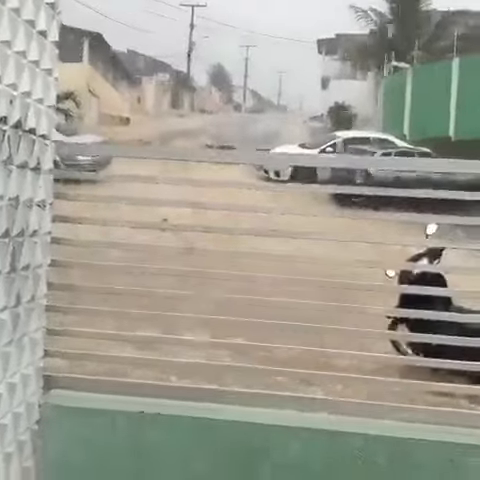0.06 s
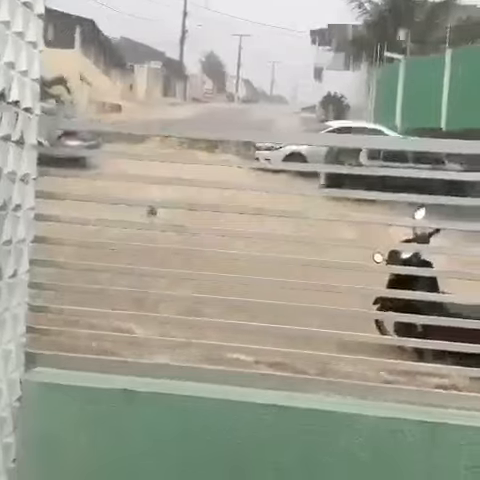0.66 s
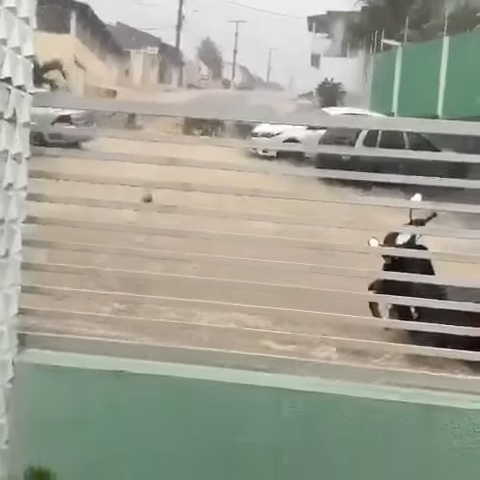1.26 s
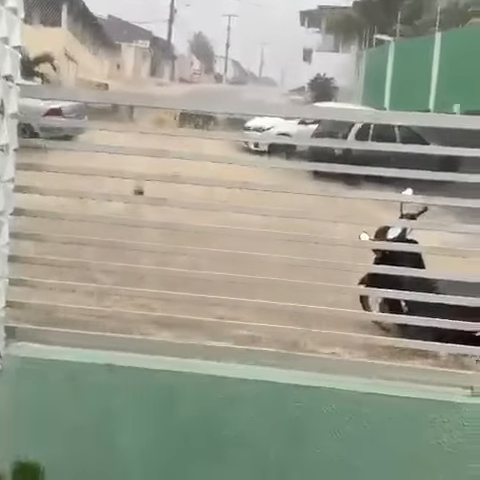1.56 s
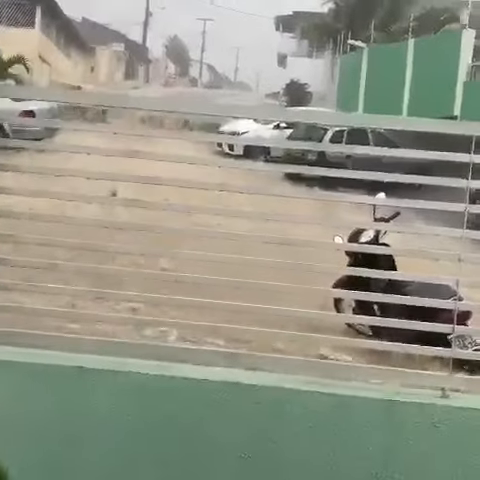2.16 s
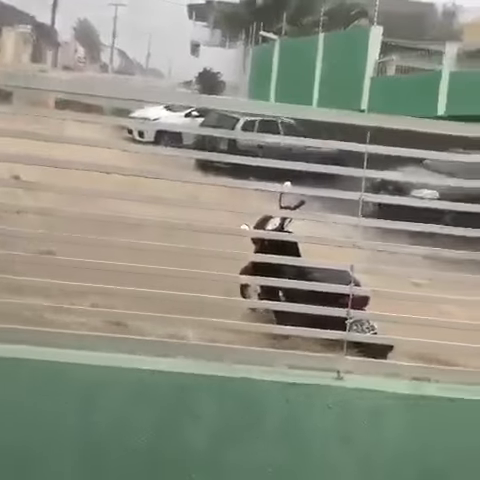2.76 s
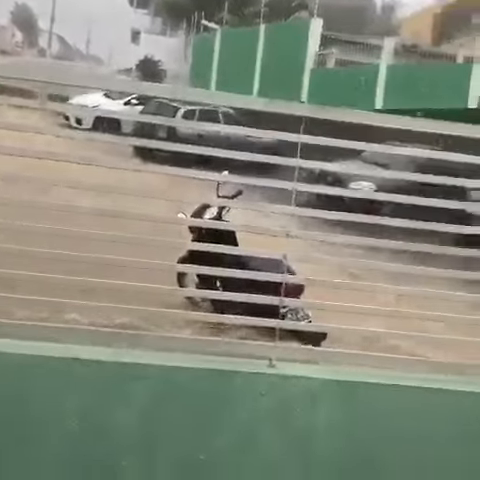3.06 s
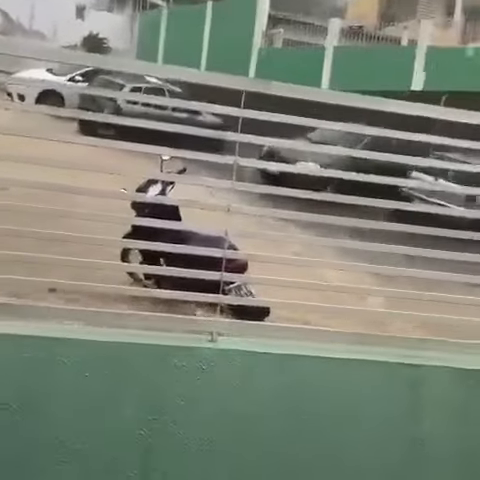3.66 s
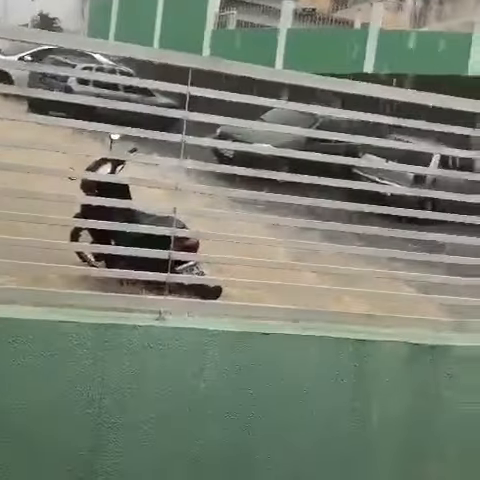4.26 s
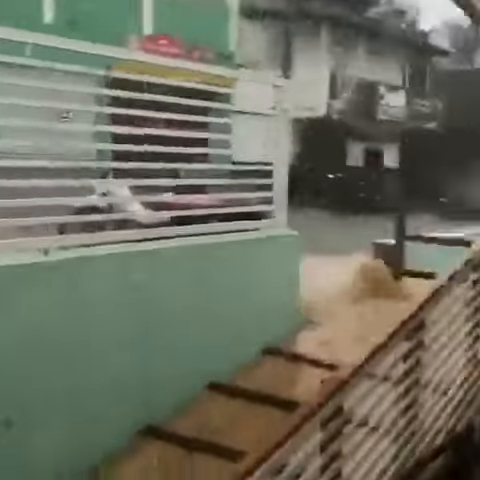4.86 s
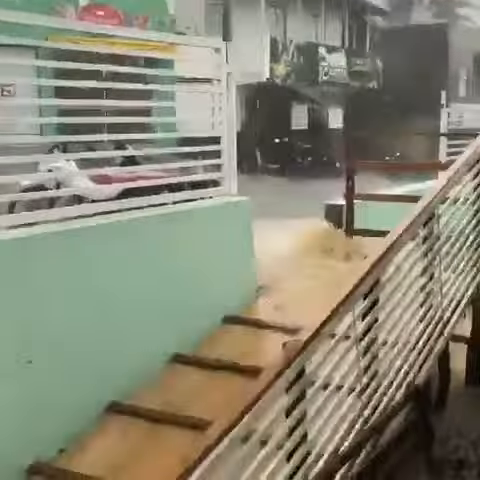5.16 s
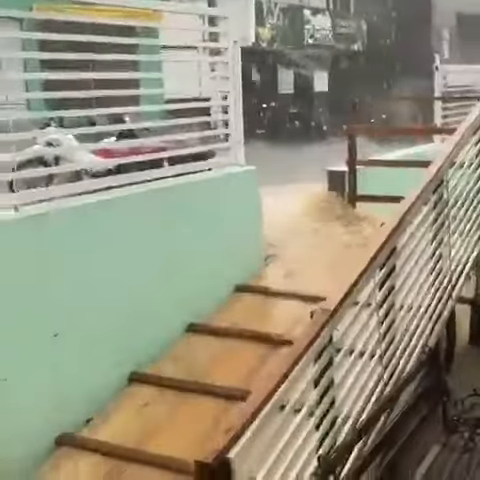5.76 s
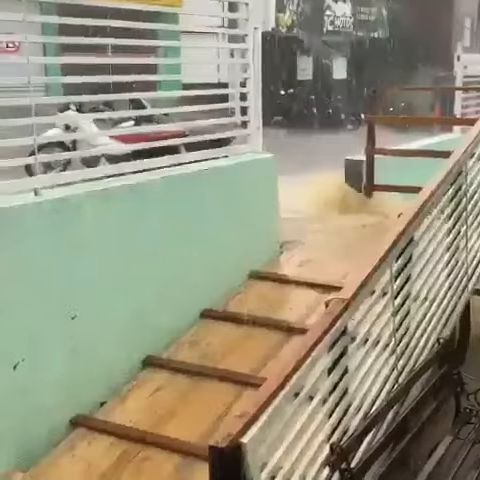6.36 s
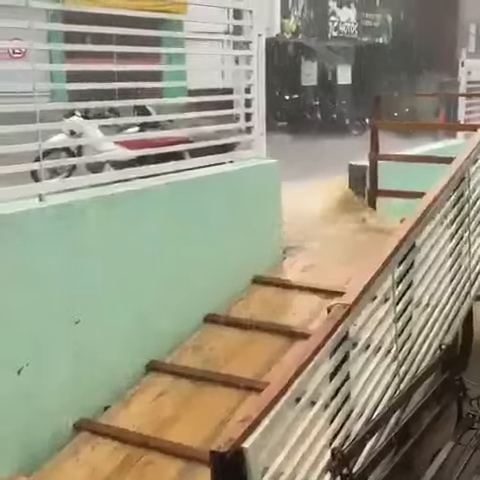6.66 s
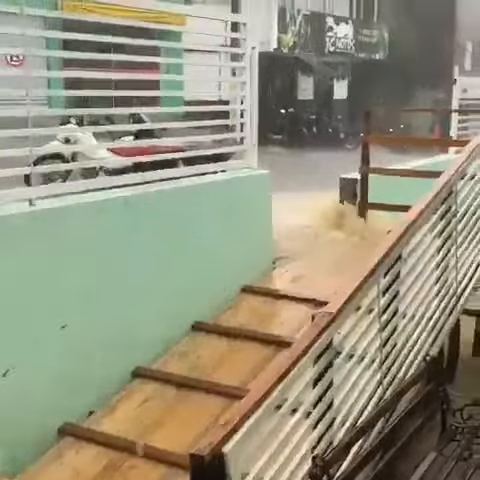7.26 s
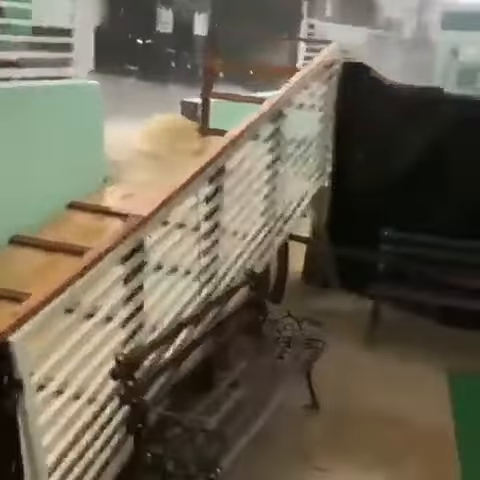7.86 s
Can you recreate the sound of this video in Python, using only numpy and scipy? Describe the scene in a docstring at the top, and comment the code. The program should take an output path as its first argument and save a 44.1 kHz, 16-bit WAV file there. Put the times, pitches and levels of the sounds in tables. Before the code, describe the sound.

Muddy floodwater rushes steadily along a street under hissing heavy rain, with a few close drips.

```python
"""A sheltered yard off a flooded street, in a downpour, heard through one small microphone.
Out in the street muddy water rushes past with a deep rumble, countless ringing bubbles and breaking
waves; heavy drops smack into it, and a faint hollow note swells and sinks. Rain hisses on the water
and the walls, loudest while the microphone faces the open gateway, where water piling up at the
foot of a ramp rumbles. Close to the microphone a few drips land and echo briefly off the walls."""
import sys
import numpy as np
from scipy import signal
from scipy.fft import rfft, irfft
from scipy.io import wavfile
from scipy.ndimage import uniform_filter1d

SR = 44100
rng = np.random.default_rng(int(sys.argv[2]) if len(sys.argv) > 2 else 0)


def log_audio(samples):
    """Write samples as a 16-bit WAV file to the path given in sys.argv[1]."""
    # one column per channel
    frames = np.atleast_2d(samples).T
    # limit to full scale, then quantise
    limited = np.clip(frames, -1, 1)
    pcm = np.round(limited * 32767).astype(np.int16)
    wavfile.write(sys.argv[1], SR, pcm)


N = 358533

# spectrum of the deep churning: f/Hz, relative level/dB
CHURN_SPECTRUM = [(25, -43), (60, -39), (95, -19.5), (130, -10.5), (175, -4), (230, -0.5), (280, 0.3),
                  (400, -3.5), (600, -10), (1500, -50)]
# spectrum of the rushing surface: f/Hz, relative level/dB
RUSH_SPECTRUM = [(80, -46.5), (250, -12.5), (400, -1), (520, 1), (900, -0.5), (1400, -3.5), (2000, -8.5),
                 (2600, -16.5), (3500, -29), (6000, -53)]
# how openly the microphone hears the water in the street: t/s, gain/dB
WATER_EXPOSURE = [(0.0, -1.44), (1.8, -1.5), (2.5, -1.1), (3.8, -0.4), (5.2, -0.36), (6.0, -0.8),
                  (6.4, -1.6), (7.2, -1.56), (8.13, -1.1)]
# spectrum of the rain, with a bright sizzle near the top: f/Hz, relative level/dB
RAIN_SPECTRUM = [(200, -28), (900, -4), (2000, 3), (2800, -2), (3600, -7.5), (4400, -8.5), (5100, -4.5),
                 (5900, 1.6), (6500, 3.5), (7000, 0), (7500, -11.5), (8200, -47.5)]
# how openly the microphone faces the gateway and the rain beyond: t/s, gain/dB (0 = fully open)
MIC_EXPOSURE = [(0.0, -3.5), (1.9, -3.5), (2.7, -2.0), (3.9, -1.8), (4.5, -1), (5.1, -1), (5.95, -1.2),
                (6.55, -2.5), (7.4, -2.7), (8.13, -1.7)]
# waves breaking in the current: crest t/s, length/s, level/dB, f/Hz, width/Hz
BREAKING_WAVES = [(0.55, 0.56, -21, 725, 420), (0.67, 0.2, -23, 340, 160), (1.2, 0.74, -25.5, 272, 150),
                  (2.163, 0.62, -24.5, 680, 420), (2.62, 0.4, -28, 1340, 450), (2.837, 0.25, -20, 725, 240),
                  (4.02, 0.48, -25, 680, 420), (4.837, 0.22, -27, 1110, 400),
                  (5.158, 0.39, -24.5, 430, 350), (5.23, 0.2, -22, 1150, 260), (5.795, 0.32, -23, 585, 360),
                  (7.754, 0.43, -26.5, 304, 200)]
# drips near the microphone: t/s, slap peak level/dB, f/Hz, width/Hz, spray below peak/dB, spray decay/s
CLOSE_DRIPS = [(1.118, -14, 5600, 1300, 15, 0.023), (3.677, -15, 6900, 890, 19, .013),
               (4.273, -20, 5300, 2000, 12, .03), (4.419, -19, 3900, 3000, 12, .015),
               (4.652, -19, 6400, 1200, 12, 0.017), (4.888, -16, 5800, 2500, 21, .008),
               (4.943, -18, 4000, 2500, 17, .01), (5.741, -17, 6170, 1500, 23, .008),
               (5.893, -15, 3000, 4000, 18, .012), (5.954, -17.5, 6300, 1100, 10, .04),
               (5.974, -20, 3460, 900, 14, .013), (6.345, -16, 6450, 700, 21, .01),
               (6.458, -16, 7140, 1200, 19, .01), (6.985, -13, 3400, 1900, 16, .013)]


def gain_of(db):
    """Decibels to amplitude."""
    return 10 ** (np.asarray(db) / 20)


def unit_rms(x):
    """Scales to rms 1."""
    return x / np.sqrt(np.mean(x ** 2) + 1e-20)


def fader(curve):
    """The gain at every sample of a curve of t/s, gain/dB."""
    s, db = np.transpose(curve)
    return gain_of(np.interp(np.arange(N) / SR, s, db))


def swell(crest_s, length_s):
    """A smooth rise from 0 to 1 and back."""
    return np.cos(np.pi * np.clip((np.arange(N) / SR - crest_s) / length_s, -.5, .5)) ** 2


def coloured(x, spectrum):
    """Filters x by a spectrum, interpolated on a log-frequency axis; rms 1."""
    hz, db = np.transpose(spectrum)
    bin_db = np.interp(np.log(np.fft.rfftfreq(N, 1 / SR) + 1), np.log(hz + 1), db)
    return unit_rms(irfft(rfft(x) * gain_of(bin_db), N))


def patchy_noise(spectrum, patch_s, patch_hz, patchy_db, size=1024):
    """Noise whose level wanders in patches of time and frequency; rms 1."""
    hop = size // 4
    frames = signal.stft(rng.standard_normal(N), nperseg=size, noverlap=size - hop)[2]
    patches = uniform_filter1d(rng.standard_normal(frames.shape), max(1, round(patch_s * SR / hop)))
    patches = unit_rms(uniform_filter1d(patches, max(1, round(patch_hz * size / SR)), axis=0))
    noise = signal.istft(frames * gain_of(patchy_db * patches), nperseg=size, noverlap=size - hop)[1]
    return coloured(noise[:N], spectrum)


def noise_band(hz, width_hz):
    """Noise gathered round one resonance; rms 1."""
    b, a = signal.iirpeak(hz, hz / width_hz, fs=SR)
    return unit_rms(signal.filtfilt(b, a, rng.standard_normal(N)))


def impacts(per_s, spread_db):
    """A random train of clicks: many small, a few large."""
    size = gain_of(spread_db * np.minimum(rng.exponential(1, N), 4))
    return size * rng.choice([-1, 1], N) * (rng.random(N) < per_s / SR)


def bubbles(low_hz, high_hz, per_s, cycles, glide, spread_db, count=32):
    """Air folded into the current: each bubble rings for a few cycles and rises in pitch."""
    out = np.zeros(N)
    for hz in np.geomspace(low_hz, high_hz, count):
        age = np.arange(int(5 * cycles * SR / hz)) * hz / SR / cycles  # in decay times
        ring = np.exp(-age) * np.sin(2 * np.pi * cycles * age * (1 + glide * age))
        out += np.sqrt(hz) * signal.oaconvolve(impacts(per_s / count, spread_db), ring)[:N]
    return unit_rms(out)


def heave(slow_hz, fast_hz, depth_db, count=20):
    """A gain that wanders at random, as turbulent water does."""
    t = np.arange(N) / SR
    rates_hz = np.geomspace(slow_hz, fast_hz, count)
    sway = sum(np.sin(2 * np.pi * (hz * t + rng.random())) for hz in rates_hz)
    return gain_of(depth_db * unit_rms(sway))


def floodwater(churn_db=-23.0, rush_db=-16.0, bubbles_db=-29.0):
    """Out in the street, a deep, heaving churn under a rushing surface full of bubbles."""
    churn = patchy_noise(CHURN_SPECTRUM, patch_s=0.11, patch_hz=170, patchy_db=0.26)
    rush = patchy_noise(RUSH_SPECTRUM, patch_s=0.054, patch_hz=350, patchy_db=-0.02)
    froth = bubbles(low_hz=311.3, high_hz=1727, per_s=1200, cycles=4.5, glide=0.03, spread_db=2.0)
    churn *= heave(slow_hz=1.1, fast_hz=3.7, depth_db=0.56)
    water = gain_of(churn_db) * churn + gain_of(rush_db) * rush + gain_of(bubbles_db) * froth
    return fader(WATER_EXPOSURE) * water


def yard_echoes(x, t60_s, wet_db):
    """The walls round the microphone add a short tail of scattered echoes."""
    t = np.arange(SR // 2) / SR
    echoes = rng.standard_normal(len(t)) * (rng.random(len(t)) < 2000 / SR) * (t > .002)
    tail = echoes * np.exp(-np.log(1000) * t / t60_s)
    return x + gain_of(wet_db) * signal.oaconvolve(x, tail / np.linalg.norm(tail))[:N]


def rain(hiss_db=-27.5, patter_db=-30.5):
    """Far drops merge into a hiss; those nearer the microphone patter as separate ticks."""
    hiss = patchy_noise(RAIN_SPECTRUM, patch_s=.05, patch_hz=700, patchy_db=1.0)
    ticks = yard_echoes(impacts(per_s=1100, spread_db=3.0), t60_s=0.038, wet_db=0.0)
    patter = coloured(ticks, RAIN_SPECTRUM)
    return fader(MIC_EXPOSURE) * (gain_of(hiss_db) * hiss + gain_of(patter_db) * patter)


def splashes(splash_db=-34.5):
    """Heavy drops smack into the flood as short, dull splats."""
    splats = bubbles(low_hz=1010, high_hz=2550, per_s=350, cycles=1.4, glide=0.02,
                     spread_db=1.5, count=16)
    return gain_of(splash_db) * fader(WATER_EXPOSURE) * splats


def breaking_waves():
    """Waves break out in the current, each a brief hollow swell of the roar."""
    return sum(gain_of(db) * swell(crest_s, length_s) * noise_band(hz, width_hz)
               for crest_s, length_s, db, hz, width_hz in BREAKING_WAVES)


def hollow_drone(crest_s=3.07, length_s=4.6, hz=305, width_hz=25, drone_db=-29.0):
    """A faint hollow note swells out of the water's roar and sinks back."""
    return gain_of(drone_db) * swell(crest_s, length_s) * noise_band(hz, width_hz)


def close_drips():
    """Large drops slap down close to the microphone, each followed by its spray."""
    out = np.zeros(N)
    t = np.arange(SR // 5) / SR
    for start_s, db, hz, width_hz, spray_below_db, spray_s in CLOSE_DRIPS:
        slap = np.exp(-np.pi * width_hz * t) * np.sin(2 * np.pi * hz * t)
        fizz = signal.fftconvolve(rng.standard_normal(len(t)), slap)[:len(t)]  # in the slap's colour
        spray = unit_rms(fizz) * np.exp(-t / spray_s)
        drip = gain_of(db) * (slap / abs(slap).max() + gain_of(-spray_below_db) * spray)
        span = out[round(start_s * SR):][:len(drip)]
        span += drip[:len(span)]
    return yard_echoes(out, t60_s=.2, wet_db=-7)


def gateway_rumble(crest_s=5.4, length_s=2.4, hz=172, width_hz=34, rumble_db=-35.0):
    """Water piling up at the foot of the ramp rumbles while the microphone faces it."""
    return gain_of(rumble_db) * swell(crest_s, length_s) * noise_band(hz, width_hz)


def scene():
    """Water and rain as they reach the one microphone in the yard, the same in both channels."""
    flood = floodwater() + breaking_waves() + gateway_rumble() + hollow_drone()
    downpour = rain() + splashes() + close_drips()
    return np.tile(flood + downpour, (2, 1))


def record(dry, bass_cut_hz=76, treble_cut_hz=7680):
    """The small microphone loses the deepest bass; a steep band limit cuts the top."""
    highpass = signal.butter(3, bass_cut_hz, "highpass", fs=SR, output="sos")
    lowpass = signal.firwin(511, treble_cut_hz, window=("kaiser", 9), fs=SR)
    return signal.oaconvolve(signal.sosfilt(highpass, dry), lowpass[None], "same")


dry = scene()
out = record(dry)
log_audio(out)
```